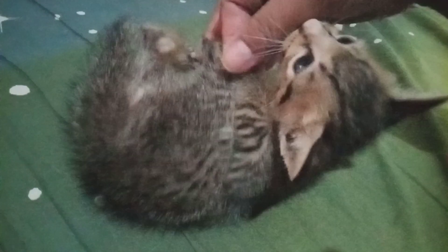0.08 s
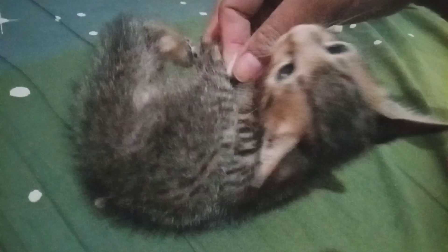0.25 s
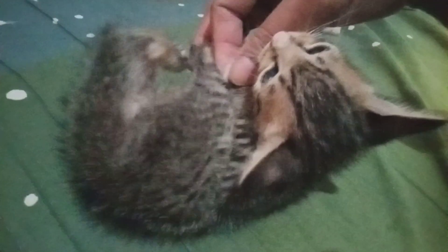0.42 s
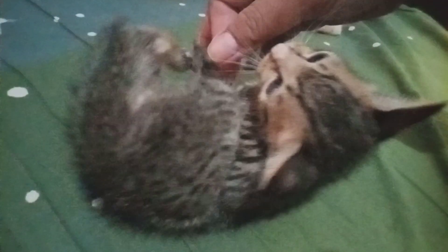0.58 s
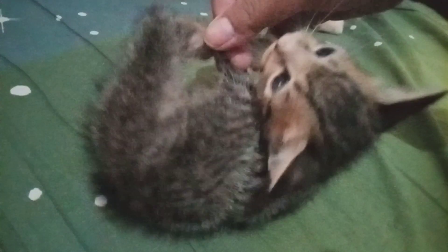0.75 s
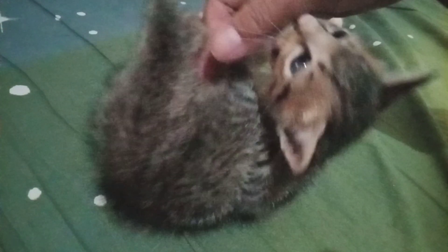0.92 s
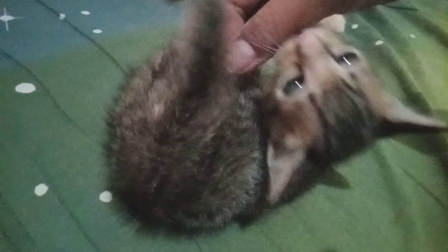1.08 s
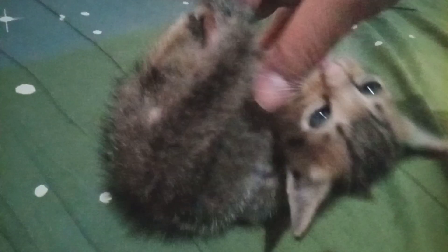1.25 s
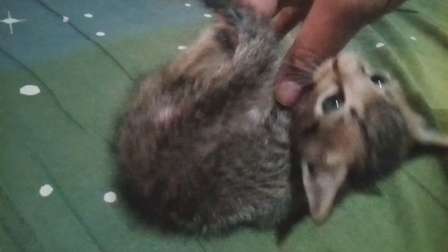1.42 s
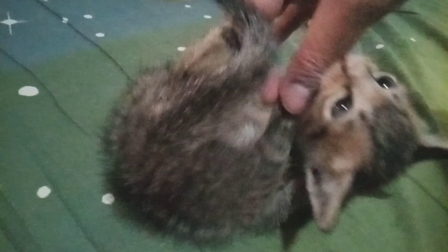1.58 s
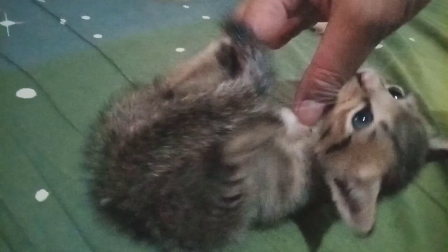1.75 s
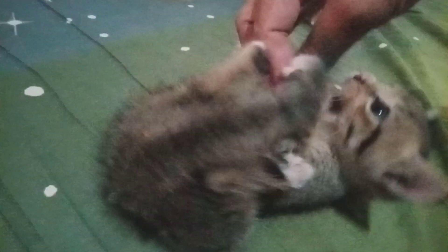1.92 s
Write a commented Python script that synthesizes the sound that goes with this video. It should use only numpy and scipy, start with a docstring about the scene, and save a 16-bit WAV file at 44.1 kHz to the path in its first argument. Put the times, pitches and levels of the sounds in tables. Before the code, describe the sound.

Moving air, probably from a fan, buffets a close microphone in low, irregular flutters and soft bumps, strongest around half a second and again near one and a half, over steady whooshing hiss and faint hum.

```python
"""Moving air, probably from a fan, buffets a microphone port: signed pressure eddies, low-cut so they overshoot,
follow a gust curve; stronger single eddies make soft bumps.
Under it: steady whoosh and hiss (shaped random spectra) and a faint hum (noise-driven resonances).
A kitten wrestles with a hand on a bed, heard only as two claw ticks (band-passed noise cracks):
one very faint, one clearer at the end."""
import sys
import numpy as np
from scipy import signal
from scipy.io import wavfile
from scipy.ndimage import uniform_filter1d

SR = 44100
rng = np.random.default_rng(int(sys.argv[2]) if len(sys.argv) > 2 else 0)


def master_out(mix):
    """Clip the mix to full scale and print it as 16-bit PCM to the path in sys.argv[1]."""
    frames = np.transpose(np.atleast_2d(mix))
    ceiling = np.clip(frames, -1, 1)
    pcm = np.round(ceiling * 32767).astype(np.int16)
    wavfile.write(sys.argv[1], SR, pcm)


def rack_gain(trim_db):
    """Turn a fader trim in dB into the linear factor to multiply a signal by."""
    fader = np.asarray(trim_db, float)
    return 10 ** (fader / 20)


N = 88200

# Gusts at the port: t/s, level before EDDIES_OFFSET_DB/dB, typical eddy width (3 sigma)/ms
GUSTS = [(0.0, -46, 6.1), (0.04, -40, 7.4), (0.09, -44.5, 4.4), (0.11, -49.5, 3.34), (0.24, -56.5, 1.33),
         (0.26, -41, 3.72), (0.47, -39.5, 3.7), (0.51, -33, 3.7), (0.67, -36, 3.32), (0.73, -45.5, 3.16),
         (0.82, -40.5, 5.9), (0.84, -49.5, 4.4), (0.92, -38.5, 4.47), (1.16, -43, 4.24), (1.24, -49, 7.2),
         (1.27, -43.5, 4.4), (1.4, -41.5, 4.9), (1.45, -34, 2.95), (1.51, -24, 4.25), (1.54, -51.5, 4.7),
         (1.62, -32, 4.17), (1.76, -41, 5.5), (1.84, -41.5, 3.6), (1.9, -68, 4.0), (1.98, -56.5, 6.1),
         (2.0, -53, 2.1)]
# Strongest single eddies: t/s of peak, level before gain/dB, width (3 sigma)/ms, signed gain (+ push, - pull)
BUMPS = [(0.082, -32.5, 5.4, -1.56), (0.2598, -34, 4.8, -1.34), (0.3501, -31, 6.6, 0.96),
         (0.4158, -35, 3.2, 1), (0.4871, -30.5, 2.8, 1), (0.502, -27, 2.7, 1), (0.5121, -21.5, 2.74, 1),
         (0.5385, -30.5, 4.4, -1), (0.559, -29.5, 1.37, 0.75), (0.5714, -24.5, 2.6, 1),
         (0.5825, -26.5, 3.5, 0.91), (0.6123, -27.5, 3, -1.4), (0.6391, -28.5, 2.8, -1.1),
         (0.6583, -28, 4.3, 1), (0.7095, -30.5, 3.6, 0.81), (.8115, -28, 4.3, 0.87), (0.9313, -32, 4.4, 1),
         (1.0006, -33.5, 5.3, -1.8), (1.0663, -27, 2.7, 1), (1.145, -32, 6.1, 0.91),
         (1.4524, -26.5, 4.3, -1.43), (1.4313, -27, 3.4, 0.85), (1.4688, -34.5, 1.16, 0.88),
         (1.473, -24.5, 1.68, 0.77), (1.4848, -25, 3.3, 1), (1.5016, -28, 1.36, 0.68),
         (1.5134, -30, 4.3, 0.93), (1.6239, -27, 3.2, 0.84), (1.6662, -35, 4.6, 1),
         (1.7103, -36.5, 2.7, -1.12), (1.7796, -32, 5.2, -1.04), (1.8343, -30, 4.34, -1.4),
         (1.9716, -39, 6.6, -0.98)]
# Whoosh and hiss spectrum: f/Hz, relative level/dB
FLOOR_SPECTRUM = [(30, -17), (100, 7), (200, -3.5), (400, -1.44), (600, -5.5), (700, -3), (900, -7.5),
                  (1000, -5.5), (1200, -0.07), (1500, -2.5), (1700, -7), (2300, -10), (3000, -18.1),
                  (3800, -23.5), (5000, -34.1), (6100, -38), (6800, -35.5), (7500, -32), (8300, -28),
                  (9000, -32.5), (10000, -39), (12000, -43), (15300, -47.5)]
# Wavering hum resonances: f/Hz, bandwidth/Hz, rms level/dB
HUM_RESONANCES = [(205.4, 6, -65.5), (298, 20, -73), (348, 6, -69), (401.6, 6.1, -67)]
# Claw ticks: t/s of onset, peak level/dB
TICKS = [(1.278, -72), (1.9768, -57)]

EDDIES_PER_S, EDDY_RANGE_DB, EDDIES_OFFSET_DB = 260, 4, -2
WIDTH_SPREAD = 0.23  # sigma of log width
CLEAR_SIGMA_S = 0.0033  # weak eddies give way around a strong one
PORT_HZ, PORT_Q = 98, 0.99
FLOOR_RMS_DB, PATCH_RMS_DB, SWELL_RMS_DB = -54, 0.15, 0.5
TICK_T60_S, TICK_LOW_HZ, TICK_HIGH_HZ = 0.01, 6860, 14500
AMPLIFIER_CUT_HZ = 48


def evened(x):
    """Scales to rms 1."""
    return x / np.sqrt(np.mean(x ** 2) + 1e-20)


def add(mix, start_s, sound):
    """Mixes a sound in; a start before zero is moved to zero, the tail is cut at the mix's end."""
    part = mix[max(round(start_s * SR), 0):][:len(sound)]
    part += sound[:len(part)]


def eddy(width_ms):
    """Gaussian swell of pressure, centred 15 ms in; width is 3 sigma."""
    t = np.arange(-0.015, 0.015, 1 / SR)
    sigma_s = max(width_ms, 0.5) / 3000
    return np.exp(-0.5 * (t / sigma_s) ** 2)


def port_low_cut(x):
    """Port as second-order plus first-order high-pass; makes each eddy overshoot."""
    w0 = 2 * np.pi * PORT_HZ
    b, a = signal.bilinear([1, 0, 0], [1, w0 / PORT_Q, w0 ** 2], SR)
    x = signal.lfilter(b, a, x)
    return signal.lfilter(*signal.butter(1, PORT_HZ, "high", fs=SR), x)


def gusts():
    """Turbulence: eddies of random sign, size and width, levelled along the gust curve."""
    eddies = np.zeros(N)
    times_s, level_db, width_ms = np.transpose(GUSTS)
    gap, sign, size = rng.random((1200, 3)).T
    centres_s = np.cumsum(0.5 + gap) / EDDIES_PER_S
    spread = rng.standard_normal(len(centres_s))
    for centre_s, side, strength, z in zip(centres_s, np.sign(sign - 0.5), size, spread):
        if centre_s < N / SR:
            width = np.interp(centre_s, times_s, width_ms) * np.exp(WIDTH_SPREAD * z)
            gain = side * rack_gain(EDDY_RANGE_DB * strength) / np.sqrt(width)
            add(eddies, centre_s - 0.015, gain * eddy(width))
    t = np.arange(N) / SR
    gust_db = EDDIES_OFFSET_DB + np.interp(t, times_s, level_db)
    return evened(port_low_cut(eddies)) * rack_gain(gust_db)


def wind():
    """Gusts, thinned around each strong eddy, plus those strong eddies."""
    out = gusts()
    t = np.arange(N) / SR
    for peak_s, *_ in BUMPS:
        out *= 1 - np.exp(-0.5 * ((t - peak_s) / CLEAR_SIGMA_S) ** 2)
    for peak_s, level_db, width_ms, gain in BUMPS:
        bump = port_low_cut(np.pad(eddy(width_ms), (0, 2000)))  # room for the overshoot
        top = np.argmax(abs(bump))
        add(out, peak_s - top / SR, gain * rack_gain(level_db) * bump / bump[top])
    return out


def whoosh_and_hiss():
    """Broadband noise: random short-time spectra with faint patches and a slow swell."""
    size, hop = 1024, 256
    frames, hz = N // hop + 5, np.fft.rfftfreq(size, 1 / SR)
    real, imag, patches = rng.standard_normal((frames, len(hz), 3)).T
    patches = uniform_filter1d(patches, size=10, axis=0)  # across frequency
    patches = evened(uniform_filter1d(patches, size=10, axis=1))  # across time
    swell = evened(uniform_filter1d(rng.standard_normal(frames), size=30))
    f_hz, level_db = np.transpose(FLOOR_SPECTRUM)
    shape_db = np.interp(np.log(hz + 1), np.log(f_hz), level_db)[:, None]
    gain_db = shape_db + PATCH_RMS_DB * patches + SWELL_RMS_DB * swell
    spectra = (real + 1j * imag) * rack_gain(gain_db)
    noise = signal.istft(spectra, nperseg=size, noverlap=size - hop)[1][:N]
    return rack_gain(FLOOR_RMS_DB) * evened(noise)


def hum():
    """Narrow resonances excited by noise, so each tone wavers."""
    t, out = np.arange(N) / SR, np.zeros(N)
    for f_hz, width_hz, level_db in HUM_RESONANCES:
        pole = np.exp(-np.pi * max(width_hz, 0.5) / SR)
        noise = rng.standard_normal(N) + 1j * rng.standard_normal(N)
        envelope = signal.lfilter([1], [1, -pole], noise)
        tone = (envelope * np.exp(2j * np.pi * f_hz * t)).real
        out += rack_gain(level_db) * evened(tone)
    return out


def claw_ticks():
    """Claw on cloth: bright noise cracks, 0.8 ms rise, exponential decay."""
    out, t = np.zeros(N), np.arange(1300) / SR
    band = signal.butter(3, [TICK_LOW_HZ, TICK_HIGH_HZ], "band", fs=SR, output="sos")
    envelope = np.minimum(t / 0.0008, 1) * rack_gain(-60 * t / TICK_T60_S)
    for start_s, peak_db in TICKS:
        crack = signal.sosfilt(band, rng.standard_normal(len(t)) * envelope)
        add(out, start_s, rack_gain(peak_db) * crack / abs(crack).max())
    return out


def scene():
    """Sum of all layers, one channel."""
    return (wind() + whoosh_and_hiss() + hum() + claw_ticks())[None]


def band_limit(x):
    """A steep low-pass at the top of the band."""
    return signal.sosfilt(signal.butter(12, 15480, fs=SR, output="sos"), x)


def record(dry):
    """The amplifier's low cut, a third-order high-pass."""
    low_cut = signal.butter(3, AMPLIFIER_CUT_HZ, "high", fs=SR, output="sos")
    mix = signal.sosfilt(low_cut, dry)
    return band_limit(mix)


dry = scene()
out = record(dry)
master_out(out)
```